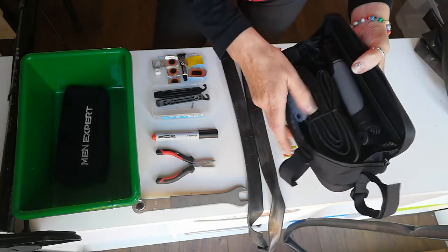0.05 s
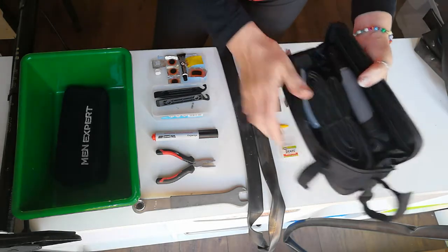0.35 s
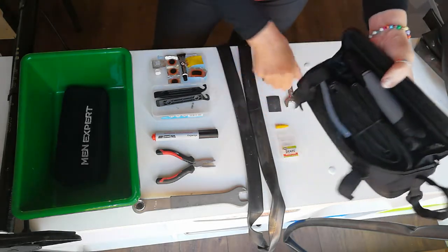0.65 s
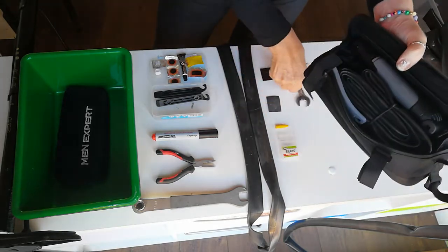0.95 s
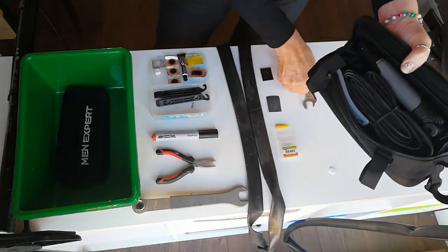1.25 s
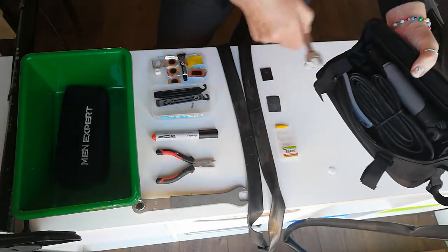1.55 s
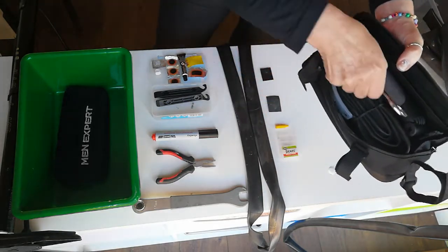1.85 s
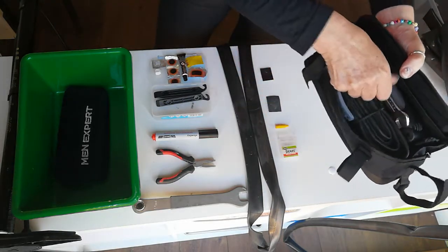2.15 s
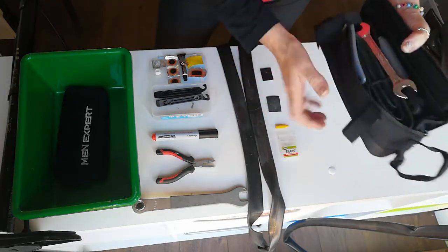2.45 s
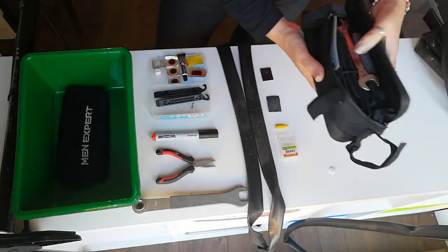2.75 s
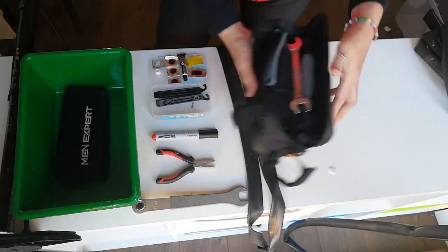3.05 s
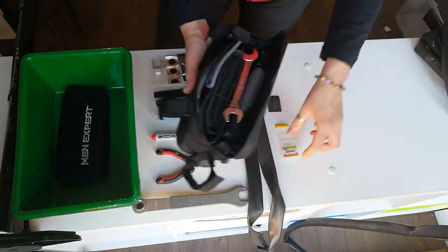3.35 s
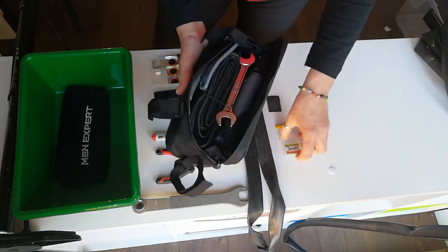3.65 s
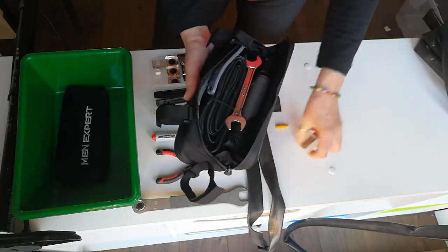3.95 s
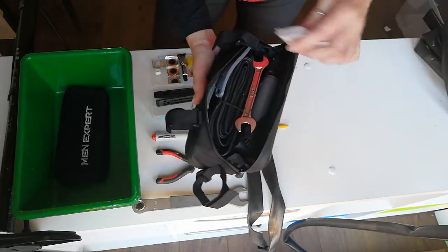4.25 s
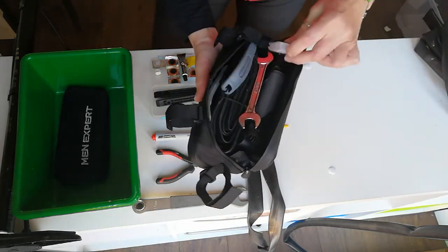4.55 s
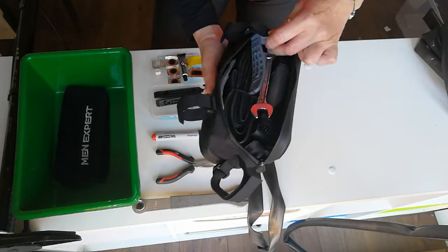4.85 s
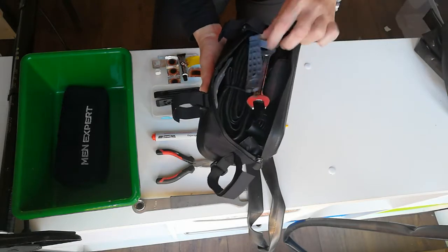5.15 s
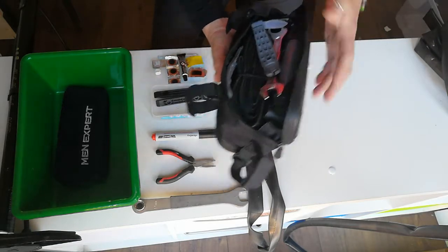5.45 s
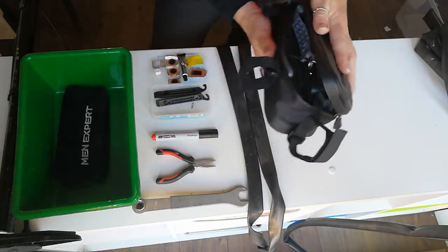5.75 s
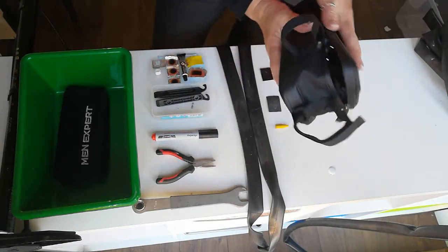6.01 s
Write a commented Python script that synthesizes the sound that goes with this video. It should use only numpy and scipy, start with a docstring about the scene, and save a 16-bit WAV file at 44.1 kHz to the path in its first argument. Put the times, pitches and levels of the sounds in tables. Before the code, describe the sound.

Small tools click and knock together inside a rustling fabric bag as it is packed on a table.

```python
"""A table in a small, lively room: a fabric saddle bag is packed, its cloth rustling at every grip.
A wrench is dragged to the edge, making the top drone and judder, and dropped in on a hand pump.
A small plastic box is slid off the table and wedged in after it; the bag is squeezed shut and the
tools clink. Friction is a train of tiny slips, a knock is a click with micro-bounces; both ring the
modes of the bodies they touch."""
import sys
import numpy as np
from scipy import signal
from scipy.fft import rfft, irfft, next_fast_len
from scipy.io import wavfile

SR = 44100
rng = np.random.default_rng(int(sys.argv[2]) if len(sys.argv) > 2 else 0)


def generate_wav(signal):
    """Clip the signal to [-1, 1] and save it as 16-bit WAV at the path in sys.argv[1]."""
    frames = np.transpose(np.atleast_2d(signal))
    scaled = np.clip(frames, -1, 1) * 32767
    pcm = np.round(scaled).astype(np.int16)
    wavfile.write(sys.argv[1], SR, pcm)


N = 272538
CUTOFF_HZ = 16200
GRIP_ATTACK_S, GRIP_SWELL_DB, GRIP_RELEASE_S = 0.0033, 3.5, 0.012

# Event levels are relative, ahead of filters and room.
# hands on the bag: (start [s], length [s], weave swish [dB], shell rub [dB])
BAG_GRIPS = [(.125, .15, -50.5, -53), (.19, 0.023, -47.5, -43.5), (.34, 0.099, -56.5, -65),
             (.563, 0.061, -43.5, -45), (.68, 0.062, -56.5, -51.5), (2.025, 0.038, -82, -42),
             (2.35, 0.069, -73.5, -67.5), (2.68, 0.043, -59.5, -58.5), (2.765, 0.074, -61.5, -60),
             (2.82, 0.24, -71.5, -63.5), (3.07, 0.073, -65.5, -54), (3.81, 0.11, -64.5, -54),
             (4.485, 0.018, -71, -47), (4.587, 0.015, -57, -36), (4.86, 0.18, -64, -52.5),
             (5.07, 0.09, -89, -63), (5.29, 0.12, -61, -58), (5.67, 0.091, -63.5, -56),
             (5.77, 0.085, -52, -45), (5.887, 0.016, -71, -40), (5.96, 0.13, -72, -58),
             (6.113, 0.14, -50, -50)]
# wrench over the table: (start [s], length [s], table drone [dB], steel scratch [dB])
WRENCH_STROKES = [(.855, 0.035, -47, -61), (.895, 0.035, -35.5, -44.5), (.93, 0.058, -54, -56.5),
                  (1.022, 0.014, -44, -54.5), (1.124, 0.085, -38.5, -57.5), (1.295, 0.067, -41, -53.5),
                  (1.335, 0.052, -36.5, -43), (1.366, 0.033, -53, -39)]
# slow pushes on the table: (start [s], length [s], lower mode [dB], upper mode [dB])
JUDDER_STROKES = [(.87, 0.092, -46.5, -41), (.94, 0.045, -42, -45), (1.02, 0.087, -57.5, -41)]
# box over the table: (start [s], length [s], box [dB], table drone [dB])
BOX_STROKES = [(3.665, 0.059, -48, -40), (3.7, 0.026, -43.5, -39.5), (3.78, 0.1, -50.5, -53),
               (3.969, 0.0045, -40.5, -51), (3.98, 0.025, -41, -53), (4.009, 0.021, -28.5, -50)]
# drags: (start [s], length [s], level [dB])
BAG_STROKES = [(2.785, 0.014, -47.5)]  # bag on table
LINING_STROKES = [(4.81, 0.21, -53), (5.05, .17, -63.5), (5.29, 0.14, -55.5)]  # box on lining
# box wedged in, silent unless end > start: (start [s], end [s], final level [dB])
WEDGE_STROKES = [(4.572, 4.609, -46.5), (4.587, 4.619, -35.5), (4.854, 4.889, -38), (5.282, 5.278, -44)]

# contacts: (time [s], level [dB], chatter decay [s])
CREASE_SNAPS = [(.091, -29, 0.0066), (.35, -22, 0.0023), (.573, -22, 0.0042), (.594, -15, 0.0043),
                (.606, -23, 0.0014), (.613, -19.5, 0.0042), (4.463, -27.5, 0.027), (4.679, -23, 0.00074),
                (4.8, -27, 0.00091), (5.334, -31, 0.0019), (5.42, -32, 0.0015)]  # cloth creases flip
PUMP_HITS = [(.157, -31, 0.0039), (.206, -21.5, 0.0073), (1.9545, -27.5, 0.0045), (1.9775, -30.5, 0.0014),
             (2.015, -10.5, 0.0017), (2.9715, -37, 0.0078)]  # on the bare pump
LOAD_HITS = [(.611, -42.5, 0.0069), (2.022, -37.5, 0.012), (3.123, -39, 0.0035), (5.672, -36.5, 0.024),
             (6.177, -37, 0.0023)]  # load on bag, bag on table
TABLE_HITS = [(1.3632, -17, 0.0029), (1.376, -16.5, 0.0023), (3.678, -35.5, 0.019)]  # on the table top: wrench tips at the edge; later a hand lands
PADDED_HITS = [(1.979, -33.5, 0.0021), (2.016, -28, 0.0041), (2.113, -34, 0.0015), (2.127, -49, 0.00082),
               (2.149, -37.5, 0.0028), (2.193, -38.5, 0.0013)]  # wrench rocks on pump through padding
WRENCH_HITS = [(2.0156, -11, 0.0023)]  # wrench lands on pump
# box on tools: (time [s], level [dB], chatter decay [s], pitch set by grip [ratio])
BOX_HITS = [(4.5515, -24.5, 0.00069, 1.03), (4.621, -25, 0.0015, 1.1), (4.7965, -22, 0.0028, 1.12),
            (4.8, -16.5, 0.004, 0.92), (4.875, -27, 0.0025, 0.95), (4.8835, -28, 0.0043, 0.845),
            (5.029, -28, 0.0029, 0.81), (5.0395, -25, 0.0021, 0.99), (5.2915, -21.5, 0.0073, 0.98),
            (5.333, -24, 0.0033, 1.17), (5.4195, -21, 0.0005, 0.93), (5.674, -29, 0.0093, 1.01)]
# steel on steel: (time [s], level [dB], chatter decay [s], cloth damping [ratio])
STEEL_HITS = [(5.8252, -10, 0.0026, 1.6), (5.845, -26.5, 0.0072, 2.1), (5.9365, -16, 0.0026, 1.05),
              (6.055, -28.5, 0.0047, 2.5), (6.175, -26, 0.0072, 0.61)]
# wrench set ringing: (time [s], lower mode [dB], upper mode [dB])
WRENCH_TOUCHES = [(5.041, -73, -49.5), (5.332, -51.5, -46), (5.421, -77, -50), (5.825, -39, -47)]

# body resonances: (frequency [Hz], width [Hz], level [dB])
PUMP_MODES = [(591, 75, 21), (747, 52, 16.5), (990, 43, 18.5), (1200, 75, 6), (2460, 340, 8.5),
              (3100, 370, 13), (6900, 2000, 0)]
PACKED_BAG_MODES = [(82.3, 5.5, -0.5), (135, 56, -3), (208, 31, 6), (410, 15, -1), (620, 1000, -8)]
TABLE_MODES = [(277, 22, 4.5), (340.4, 39, 15.5), (420, 50, 16), (549, 49, 12), (617.5, 17, 13.5),
               (762, 41, 9.5), (1760, 37, -18)]
TABLE_FLEX_MODES = [(133.4, 4.2, 0), (214, 12, 0)]
LOAD_MODES = [(576, 27, 0)]
BOX_ON_TABLE_MODES = [(538, 60, 13.5), (717, 145, 17.4), (825, 37, 2.9), (1510, 200, 13), (1960, 270, 12.4),
                      (2300, 95, 15.5), (6600, 3700, 0.5)]
BOX_MODES = [(1467, 62, 4), (1790, 120, 2), (1994, 230, 12), (5000, 520, -5), (8100, 2760, -11)]
STEEL_MODES = [(1994, 70, -1.5), (3360, 87, 8), (4780, 93, 8), (5400, 200, -4), (7150, 150, 1),
               (8140, 1700, -5), (10270, 110, -3)]
# wrench's bright click, with a high sheen from the microphone's 15 kHz peak:
# (frequency [Hz], width [Hz], level [dB])
WRENCH_CLICK_PEAKS = [(4550, 160, 2), (6200, 280, -2), (10900, 7800, -5), (14800, 670, -5)]
# wrench bending: (frequency [Hz], width [Hz])
BENDING_MODES = [(4295, 13), (7468, 52)]

# noise spectra: (frequency [Hz], density [dB])
WEAVE_SPECTRUM = [(900, -19), (1700, -27), (2900, -4), (4000, -5.5), (6500, -6), (8000, -2.5),
                  (10500, -9.5), (15000, -10.5)]
SHELL_SPECTRUM = [(30, -28), (100, -16), (220, -9), (420, -3), (650, -3.5), (1000, -11), (2000, -13.5),
                  (5000, -24)]
SCRATCH_SPECTRUM = [(400, -36), (1250, 1), (1700, 9), (2800, 7.5), (7000, -0.5), (10000, -2.5),
                    (15000, -11)]
LINING_SPECTRUM = [(1000, -10), (5200, -2.5), (10500, -7.5), (15000, -2)]
ROOM_TONE_SPECTRUM = [(25, 0.5), (300, -7), (600, -16.5), (1500, -30), (3500, -20), (6800, -32.5),
                      (10000, -13.5), (15500, -11.5)]
# room decay: (frequency [Hz], T60 [s])
TAIL_T60_S = [(100, 1), (300, 0.41), (1800, 0.53), (6000, 0.5), (14000, 0.27)]
# room tail against direct sound: (frequency [Hz], level [dB])
TAIL_DB = [(100, -8.5), (500, -2.5), (2500, -0.5), (7000, 1.5), (14000, -0.5)]
# where the hands work: (time [s], left lag [s], left gain [dB])
WORK_PATH = [(.2, .000055, -1.5), (1.15, .00006, 0), (2.0, .00015, -1), (2.8, .00006, 2), (3.9, .00011, 0),
             (4.8, 0, 1), (5.42, 0, 0), (5.83, .00006, -2)]
# microphone port responses: (frequency [Hz], gain [dB])
LEFT_PORT_DB = [(900, 4.5), (2000, 6), (3200, -1.5), (3800, -3), (5500, -3.5), (7500, 4.5), (9000, -5),
                (13000, -14)]
RIGHT_PORT_DB = [(900, 6), (2000, 2), (3100, 5), (3800, -5), (5200, 6), (6800, 8.5), (9000, -6),
                 (12500, -11), (14300, 0), (15100, 2), (16000, -6)]


def from_db(db):
    return 10 ** (np.asarray(db) / 20)


def unit_rms(x):
    return x / np.sqrt(np.mean(x ** 2) + 1e-20)


def at_hz(points, hz):
    """Table lookup on a log-frequency axis."""
    points_hz, values = np.transpose(points)
    return np.interp(np.log(np.maximum(hz, 1)), np.log(points_hz), values)


def cut(x, hz, kind):
    """Gentle low-, high- or band-pass."""
    return signal.sosfilt(signal.butter(2, hz, kind, fs=SR, output="sos"), x)


def colour(x, spectrum):
    """Minimum-phase filter with the given spectrum."""
    size = 2 * next_fast_len(len(x) // 2 + SR // 20)
    gain = from_db(at_hz(spectrum, np.fft.rfftfreq(size, 1 / SR)))
    cepstrum = irfft(np.log(gain))
    cepstrum[1:size // 2] *= 2
    cepstrum[size // 2 + 1:] = 0
    return irfft(rfft(x, size) * np.exp(rfft(cepstrum)))[:len(x)]


def convolve(x, response):
    return signal.fftconvolve(x, response)[:N]


def drift(rate_hz):
    """Smooth random curve, unit RMS."""
    values = rng.standard_normal(N // 10)
    return unit_rms(np.interp(np.arange(N) * rate_hz / SR, np.arange(len(values)), values))


def ringing(modes, uneven_db=0, pitch=1, damping=1):
    """Impulse response of resonances; the contact point weights them by chance."""
    t, out = np.arange(SR // 2) / SR, 0
    for hz, width_hz, db in modes:
        gain = from_db(db + uneven_db * rng.standard_normal()) * width_hz
        decay = np.exp(-np.pi * damping * width_hz * t)
        out = out + gain * decay * np.cos(2 * np.pi * pitch * hz * t)
    return out


def strokes(rows, attack_s, swell_db, release_s):
    """Hand pressure takes hold, swells or eases, lets go; one gain curve per dB column."""
    t, out = np.arange(N) / SR, 0
    for start_s, length_s, *levels_db in rows:
        age_s = t - start_s
        swell = from_db(swell_db * (np.clip(age_s / length_s, 0, 1) - 1.5))
        attack = np.clip(age_s / attack_s, 0, 1)
        release = np.exp(-np.clip((age_s - length_s) / release_s, 0, 20))
        out = out + np.outer(from_db(levels_db), attack * swell * release)
    return out


def friction(rate_hz, spread_db, clump_db, clump_hz):
    """Tiny slips of uneven size, in clumps."""
    slips = (rng.random(N) < rate_hz / SR) * rng.choice([-1, 1], N)
    sizes_db = spread_db * np.minimum(rng.exponential(1, N), 4)
    return slips * from_db(sizes_db + clump_db * np.clip(drift(clump_hz), -2, 2))


def scraping(slips, gain, spectrum, crisp_db):
    """Friction noise; harder strokes open the top treble."""
    noise = unit_rms(colour(slips, spectrum))
    treble = cut(noise[::-1], 8100, "high")  # reversed to decorrelate
    return gain * (noise + from_db(crisp_db) * np.sqrt(gain / gain.max()) * treble)


def rubbed(force, gain, modes):
    """Friction drives a body, which rings on after the stroke."""
    response = ringing(modes)
    return convolve(gain * unit_rms(force), response / np.linalg.norm(response))


def strike(contacts, response, chatter):
    """One click plus dying micro-bounces per contact; extra columns go to response()."""
    out, t = np.zeros(N + SR), np.arange(SR // 20) / SR
    for time_s, level_db, chatter_s, *grip in contacts:
        bounces = rng.standard_normal(len(t)) * (rng.random(len(t)) < .1)
        force = chatter * bounces * np.exp(-t / max(chatter_s, 1 / SR))
        force[0] = 1
        hit = signal.fftconvolve(force, response(*grip))
        at = int(time_s * SR)
        out[at:at + len(hit)] += from_db(level_db) * hit / np.abs(hit).max()
    return out[:N]


def cloth(held_swish_db=-77, held_rub_db=-72):
    """Stiff nylon swishes and snaps; the padded shell rubs on hands and table, faintly between grips."""
    grips = strokes(BAG_GRIPS, GRIP_ATTACK_S, GRIP_SWELL_DB, GRIP_RELEASE_S)
    swish, rub = grips + from_db([[held_swish_db], [held_rub_db]])
    weave_slips = friction(rate_hz=2600, spread_db=3, clump_db=1, clump_hz=99)
    weave = scraping(weave_slips, swish, WEAVE_SPECTRUM, crisp_db=9.5)
    shell_slips = friction(rate_hz=1500, spread_db=2, clump_db=2, clump_hz=90)
    shell = rub * unit_rms(colour(shell_slips, SHELL_SPECTRUM))
    snaps = strike(CREASE_SNAPS, lambda: cut(signal.unit_impulse(SR // 50), 7550, "high"), chatter=1)
    return weave + shell + snaps


def pump_knocks():
    """The pump rings when hit bare, thuds when hit through padding."""
    bare = strike(PUMP_HITS, lambda: ringing(PUMP_MODES), chatter=0.4)
    thud = cut(ringing(PUMP_MODES, damping=4.8), [280, 680], "band")
    return cut(bare, 173, "high") + strike(PADDED_HITS, lambda: thud, chatter=0.5)


def bag_thumps():
    """The whole load bumps softly in its low modes."""
    return strike(LOAD_HITS, lambda: cut(ringing(PACKED_BAG_MODES), [45, 600], "band"), chatter=0.82)


def wrench_drag():
    """Slips scratch the steel and drive the table top; it knocks as the wrench tips, later a hand lands."""
    drone, scratch = strokes(WRENCH_STROKES, attack_s=0.0036, swell_db=-1, release_s=0.0072)
    slips = friction(rate_hz=6000, spread_db=2, clump_db=1.5, clump_hz=250)
    knocks = strike(TABLE_HITS, lambda: ringing(TABLE_MODES), chatter=1)
    table = cut(rubbed(slips, drone, TABLE_MODES) + knocks, [210, 1000], "band")
    return table + scraping(slips, scratch, SCRATCH_SPECTRUM, crisp_db=6)


def table_judder():
    """Slow stick-slip flexes the whole top; the wrench's position sets which mode answers."""
    pushes = strokes(JUDDER_STROKES, attack_s=0.012, swell_db=6, release_s=0.029)
    slips = friction(rate_hz=900, spread_db=1, clump_db=.7, clump_hz=60)
    return sum(rubbed(slips, push, [mode]) for push, mode in zip(pushes, TABLE_FLEX_MODES))


def wrench_drop():
    """The wrench lands on the pump with a dry click."""
    return strike(WRENCH_HITS, lambda: ringing(WRENCH_CLICK_PEAKS), chatter=0.57)


def bag_shift():
    """Pushed over the table, the load gives a short hollow groan."""
    push, = strokes(BAG_STROKES, GRIP_ATTACK_S, GRIP_SWELL_DB, GRIP_RELEASE_S)
    return rubbed(rng.standard_normal(N), push, LOAD_MODES)


def box_slide(edge_db=-22):
    """Hollow box and table resonate together; the box's edge adds a fine scratch."""
    push, drone = strokes(BOX_STROKES, attack_s=0.0033, swell_db=11.5, release_s=0.0048)
    slips = friction(rate_hz=4500, spread_db=3, clump_db=1, clump_hz=620)
    box = rubbed(cut(slips, [380, 3200], "band"), push, BOX_ON_TABLE_MODES)
    edge = from_db(edge_db) * scraping(slips, push, SCRATCH_SPECTRUM, crisp_db=10)
    return box + rubbed(slips, drone, TABLE_MODES) + edge


def box_in_bag():
    """Shoves build and stop dead; the box clicks on the tools, too small to radiate bass."""
    t = np.arange(N) / SR
    push = sum(from_db(db) * (t > start_s) * (t < end_s) * (t - start_s) / (end_s - start_s)
               for start_s, end_s, db in WEDGE_STROKES)
    slips = friction(rate_hz=2500, spread_db=2.2, clump_db=2, clump_hz=600)
    clicks = strike(BOX_HITS, lambda pitch: ringing(BOX_MODES, uneven_db=1.5, pitch=pitch), chatter=0.29)
    return cut(rubbed(slips, push, BOX_MODES) + clicks, 1190, "high")


def lining_crackle():
    """The box's edges catch on the stiff lining: sparse, sharp ticks."""
    press, = strokes(LINING_STROKES, GRIP_ATTACK_S, swell_db=0, release_s=GRIP_RELEASE_S)
    ticks = friction(rate_hz=170, spread_db=3, clump_db=1, clump_hz=60)
    return press * unit_rms(colour(ticks, LINING_SPECTRUM))


def wrench_ring():
    """Touched where the cloth leaves it free, the wrench sings faintly in two bending modes."""
    t, out = np.arange(N) / SR, 0
    for time_s, *levels_db in WRENCH_TOUCHES:
        age_s = np.maximum(t - time_s, 0)
        for (hz, width_hz), db in zip(BENDING_MODES, levels_db):
            decay = np.exp(-np.minimum(np.pi * width_hz * age_s, 20))
            out = out + from_db(db) * decay * np.sin(2 * np.pi * hz * age_s)
    return out


def steel_clinks():
    """Steel on steel, damped by the cloth."""
    return strike(STEEL_HITS, lambda damping: ringing(STEEL_MODES, uneven_db=2, damping=damping),
                  chatter=0.54)


def scatter(low_hz, ring_s):
    """Small things nearby smear a click's treble: a chain of all-passes."""
    out = signal.unit_impulse(SR // 2) + 1e-18
    radius = np.exp(-1 / (ring_s * SR))
    for centre_hz in rng.uniform(low_hz, CUTOFF_HZ, size=12):
        poles = [1, -2 * radius * np.cos(2 * np.pi * centre_hz / SR), radius * radius]
        out = signal.lfilter(poles[::-1], poles, out)
    return cut(out, low_hz, "high")


def room(x, scatter_db=5.5, build_s=0.0012, apart_hz=251):
    """Bright scatter, then a tail dying band by band; the sides are alike only below apart_hz."""
    t = np.arange(SR // 2) / SR
    edges_hz = np.geomspace(60, 17000, 15)
    white, tail = rng.standard_normal((2, 3, len(t))), 0
    for k, (low_hz, high_hz) in enumerate(zip(edges_hz, edges_hz[1:])):
        hz = np.sqrt(low_hz * high_hz)
        envelope = from_db(-60 * t / at_hz(TAIL_T60_S, hz)) * (1 - np.exp(-(t / build_s) ** 2))
        shared, *own = cut(white[k % 2], [low_hz, high_hz], "band")
        band = envelope * (shared + hz / apart_hz * np.array(own))
        band *= np.sqrt(2 * (high_hz - low_hz) / SR) / np.linalg.norm(band, axis=1, keepdims=True)
        tail = tail + from_db(at_hz(TAIL_DB, hz)) * band
    near = np.array([scatter(low_hz=2957, ring_s=0.00037) for _ in tail])
    near *= from_db(scatter_db) / np.linalg.norm(near, axis=1, keepdims=True)
    return np.array([convolve(x, side) for side in tail + near])


def moving_room(x):
    """Hands and bag move, so the reflections crossfade to a new pattern about every half second."""
    position = np.linspace(0, 12, N)
    return sum(room(x * np.cos(np.pi / 2 * np.clip(position - k, -1, 1))) for k in range(13))


def scene(work_db=-5, room_tone_db=-67):
    """All handling shares one moving place and the room, over a faint room tone."""
    work = cloth() + bag_shift() + wrench_drag() + box_slide() + table_judder()
    work += pump_knocks() + wrench_drop() + steel_clinks() + bag_thumps() + wrench_ring()
    work += box_in_bag() + lining_crackle()
    t = np.arange(N) / SR
    times_s, *columns = np.transpose(WORK_PATH)
    lag_s, left_db = [np.interp(t, times_s, column) for column in columns]
    direct = np.array([np.interp(t - lag_s, t, work), work])
    left, right = direct + moving_room(work)
    shared, *own = [unit_rms(colour(rng.standard_normal(N), ROOM_TONE_SPECTRUM)) for _ in range(3)]
    room_tone = from_db(room_tone_db) * unit_rms(shared + np.array(own))
    return from_db(work_db) * np.array([from_db(left_db) * left, right]) + room_tone


def record(dry):
    """Each microphone port colours its side; a steep low-pass cuts the top."""
    ports = np.array([colour(dry[0], LEFT_PORT_DB), colour(dry[1], RIGHT_PORT_DB)])
    return signal.sosfilt(signal.ellip(10, .2, 70, CUTOFF_HZ, fs=SR, output="sos"), ports)


dry = scene()
out = record(dry)
generate_wav(out)
```